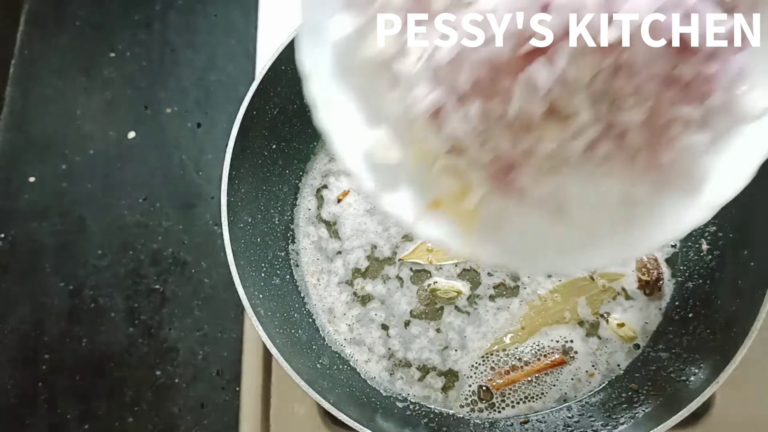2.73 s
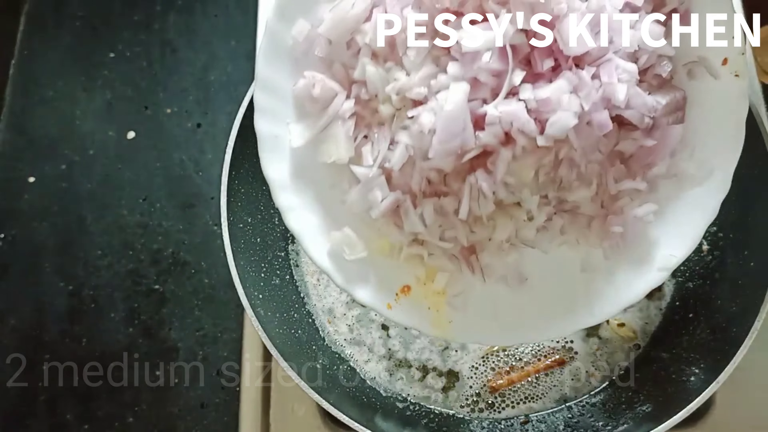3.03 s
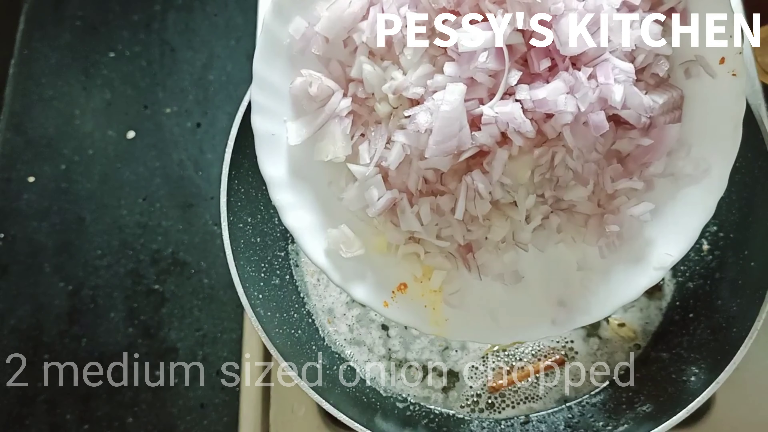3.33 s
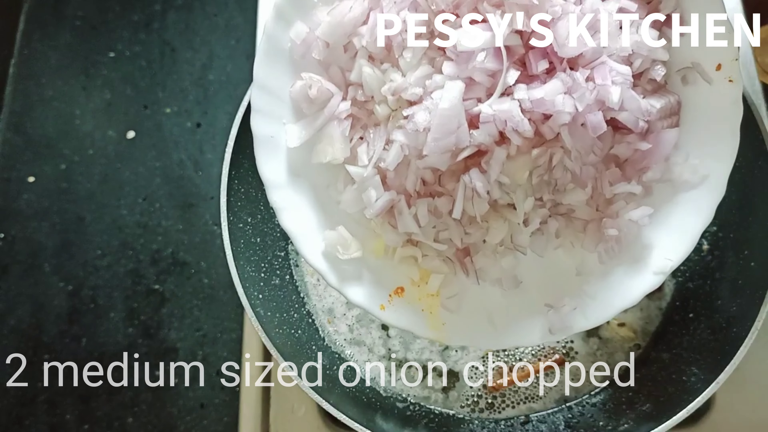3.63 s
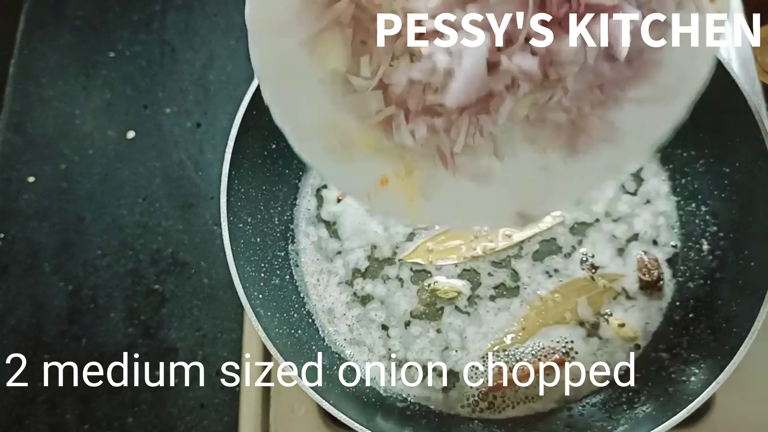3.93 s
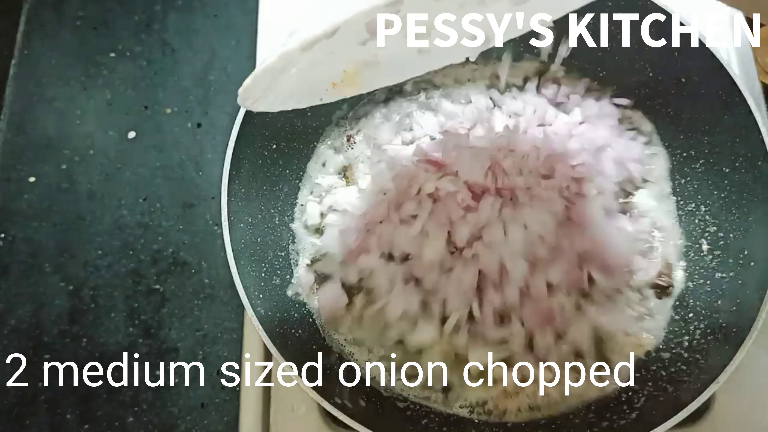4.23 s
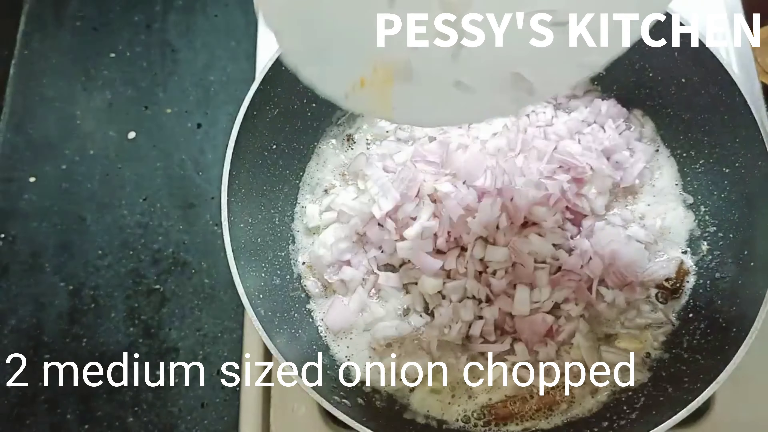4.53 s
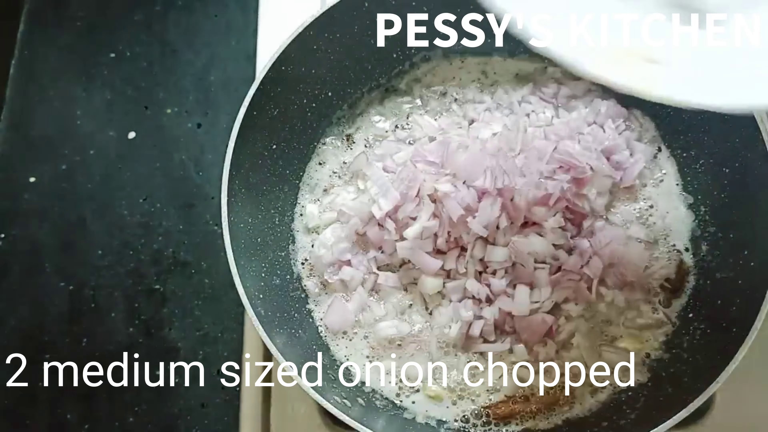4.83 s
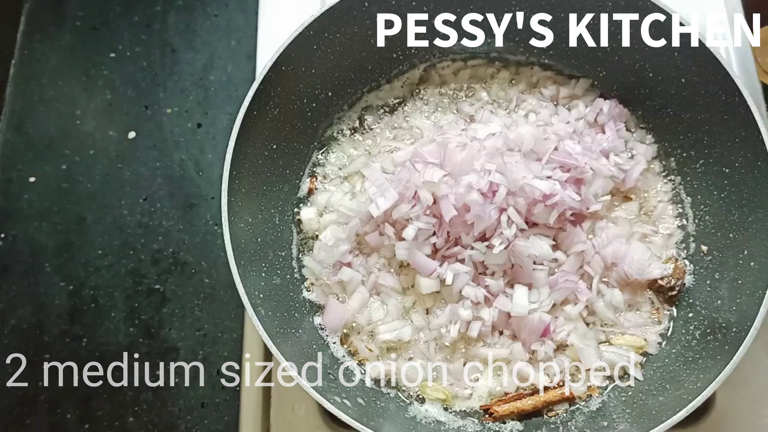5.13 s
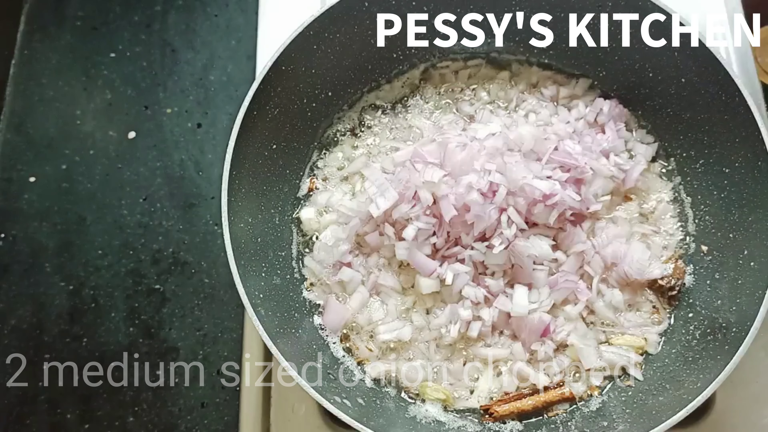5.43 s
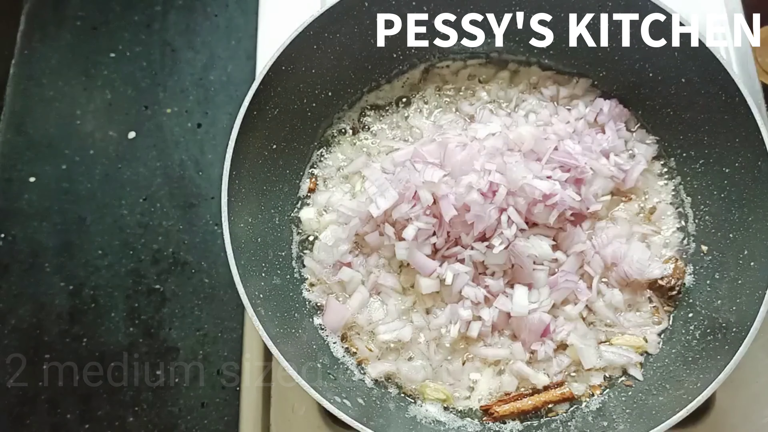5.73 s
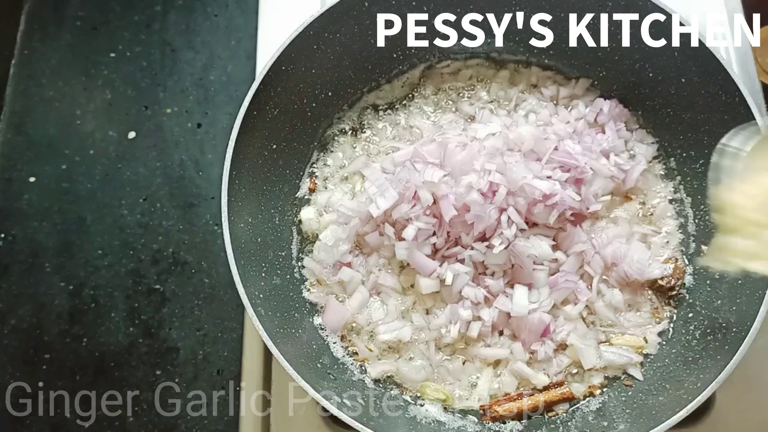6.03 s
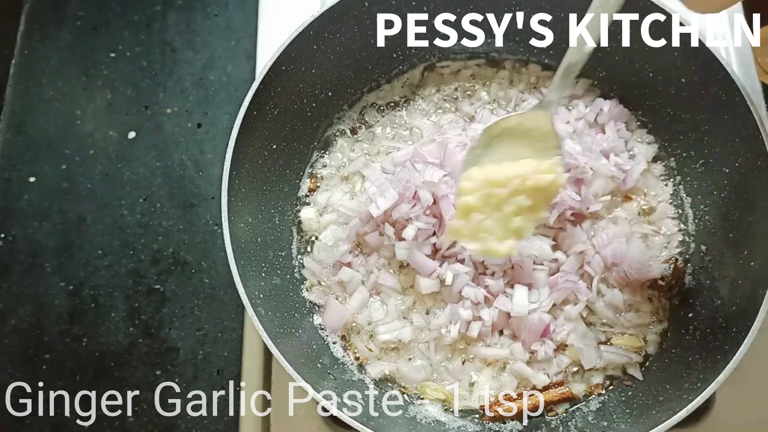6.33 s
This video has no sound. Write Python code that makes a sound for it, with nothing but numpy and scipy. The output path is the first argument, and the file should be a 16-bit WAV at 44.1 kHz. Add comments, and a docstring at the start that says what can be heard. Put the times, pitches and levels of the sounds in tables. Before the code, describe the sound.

A metal spoon knocks and briefly scrapes a frying pan, which rings a little. Butter foams softly while a ceiling fan throbs over a low house rumble, and a horn toots out in the street. Chopped onions drop in with a loud, spitting sizzle that cuts after a second to gentle frying, with two fainter toots. The pan is close to the microphone in a home kitchen.

```python
"""Onions drop into a pan of quietly foaming butter with a loud, spitting sizzle, then fry gently.
The sizzle is water bursting into steam: swarms of clicks over hiss, with pitched pops and sharp spits.
A spoon knocks and scrapes the pan early on, ringing its modes; one more knock comes with the onions.
Behind it a ceiling fan throbs once a turn, the house rumbles, something squeaks faintly and a two-tone
horn sounds in the street. The cooking runs in three stages, joined by hard cuts."""
import sys
import numpy as np
from scipy import signal
from scipy.fft import rfft, irfft
from scipy.io import wavfile

SR = 44100
rng = np.random.default_rng(int(sys.argv[2]) if len(sys.argv) > 2 else 0)


def transcribe(u):
    """Save the signal u as a 16-bit wav file named by the first command-line argument.

    u: samples, shape (n,) or (channels, n), limited to [-1, 1]; the rate is SR.
    q: integer samples, one column per channel.
    """
    v = np.clip(np.atleast_2d(u).T, -1, 1)
    q = np.round(v * 32767).astype(np.int16)
    wavfile.write(sys.argv[1], SR, q)


N = 285327
T = np.arange(N) / SR
LOW_FOAM_S, ONIONS_S, SIMMER_S = 2.115, 4.112, 5.118  # second stage, onions land, third stage

# Tone of foaming butter, then of the duller foam: freq_hz, level_db
FOAM_COLOUR = [(410, -33), (700, -5), (747, -13), (819, -6.5), (921, -15), (995, -8), (1360, -8.5),
               (1530, -8.5), (5570, -4.5), (9380, -15), (14800, -10), (15800, -15.5)]
LOW_FOAM_COLOUR = [(410, -35), (700, -10), (819, -8.5), (909, -12.5), (1470, -14), (2420, -16.5),
                   (2650, -14), (4120, -18.5), (5570, -21), (7810, -28), (13300, -30), (15800, -26)]
# Ringing modes of the pan, struck on its floor or rim: pitch_hz, t60_s, floor_db, rim_db
PAN_MODES = [(394.6, 0.49, -14.5, -35), (549, 0.16, 7.5, -38), (597.3, 0.6, -17, -24.5),
             (623, 0.17, -4, -1), (688, 0.13, -13, -7), (787, 0.28, -17, -32), (884, 0.41, -10.5, -23),
             (970, 0.48, -21, -59), (1160, 0.27, -12, -24), (1183, 0.1, -8.5, -13.5),
             (1282, 0.29, -14, -33), (1814, 0.33, -12.5, -31), (1846, 0.15, 2, -39), (2020, .18, -28, -57),
             (2540, 0.22, -11.5, -24), (2830, 0.062, -56, -33.5), (3640, .16, -15, -34),
             (5360, 0.13, -18, -53)]
# Ringing modes of the spoon: pitch_hz, t60_s, level_db
SPOON_MODES = [(4902, 0.068, 2), (4670, 0.06, -10), (6300, 0.13, -24), (6900, 0.091, -14)]
# Hits on the pan: start_s, ring_db, rim_share (0 floor, 1 rim), click_db, click_hz, contact_s
KNOCKS = [(0.0, -32, 0.64, -27.5, 1130, 0.0069), (0.043, -29.5, 0.59, -26.5, 1170, 0.0037),
          (0.2492, -67, .46, -36.5, 1900, 0.0066), (0.373, -31, 1, -27, 2960, 0.0018),
          (0.4907, -53.5, 0.86, -35, 5670, 0.0013), (0.683, -27.5, 0.13, -14.5, 1250, 0.0033),
          (0.7195, -46, 0.48, -31, 5800, .0015), (0.735, -57, .17, -33.5, 3680, 0.024),
          (4.117, -37, 1, -38, 665, 0.045)]
# Tone of the contact click, the sliding spoon and the grit under it: freq_hz, level_db
CLICK_COLOUR = [(100, -32), (300, -13), (600, 11), (1300, 3.5), (2000, 2), (3200, -2), (4000, -1.5),
                (4900, -7.5), (5800, 2.5), (7000, -12), (11000, -21), (15000, -16)]
SCRAPE_COLOUR = [(260, -20), (450, -1), (597, 1), (1050, -6), (1170, 7), (1550, -32), (1690, -3),
                 (3840, -2.5), (8970, -21.5), (14000, -27), (15800, -12)]
GRIT_COLOUR = [(500, -20), (2600, -10), (5800, 2), (9000, -5), (14000, 0), (15800, -4)]
# Tone of the house rumble and the fan's swish: freq_hz, level_db
RUMBLE_COLOUR = [(12, -45), (20, -7), (44, 3.5), (59, -2.5), (70, -3.5), (105, 2.5), (156, 0.5), (248, -19),
                 (290, -10), (352, -20), (426, -11.5), (549, -14.5), (654, -15), (709, -25), (900, -21.5),
                 (1170, -46.5), (1980, -120)]
SWISH_COLOUR = [(88, -28), (150, -18), (253, -5.5), (281, -9), (348, -0.5), (389, -7.5), (515, -16.5),
                (669, -12.5), (911, -24.5), (1400, -34.5), (1820, -68), (3080, -120)]
# The fan in the first two stages: first_throb_s, turn_s, hum_db, third_harmonic_db, swish_db
FAN_RUNS = [(0.215, .493, -39.5, -63, -52), (2.167, .4288, -41, -49.5, -50.5)]
# Horn blasts: start_s, end_s, relative_db, low_tone_hz, high_tone_hz, low_cut_hz
HONKS = [(3.199, 3.431, -40.5, 339.4, 396.6, 910), (5.17, 5.474, -49.5, 341.3, 404.3, 2670),
         (5.528, 5.8, -54.5, 325.4, 401, 2750)]
# Partials of the horn: tone (0 low, 1 high), harmonic_number, level_db
HORN_PARTIALS = [(0, 4, -21), (0, 5, -19.5), (0, 6, -15), (0, 7, -8), (0, 8, -14.5), (0, 9, -11.5),
                 (0, 10, -0.5), (0, 11, -20.5), (0, 15, -27), (0, 17, -27), (1, 4, -26), (1, 6, -9),
                 (1, 7, -3.5), (1, 8, -10), (1, 13, -33), (1, 14, -23.5)]
# Tone of the horn's breathy rasp: freq_hz, level_db
HORN_RASP_COLOUR = [(900, -33), (1500, -4), (2000, -8), (3200, -5), (3900, 8), (4600, -14), (5600, 2),
                    (7500, -25)]
# Large water drops bursting in the fat: start_s, peak_db
SPITS = [(4.094, -41.5), (4.425, -11.5), (4.465, -8.5), (4.54, -6), (4.567, -11.5), (4.665, -18.5),
         (4.739, -10), (4.747, -13), (4.937, -16)]
# Tone of a spit, the loud sizzle, the gentle frying and the drone under it: freq_hz, level_db
SPIT_COLOUR = [(200, -26), (1000, -14), (1800, -7), (2300, 0.5), (4000, 5), (5800, 3.5), (7000, -1),
               (9000, -7), (11000, -24), (15800, -25)]
SIZZLE_COLOUR = [(200, -30.5), (400, -25), (560, -14.5), (1020, -13.5), (1360, -8.5), (1850, -8.5),
                 (2150, -6), (2600, -3), (3300, 1.5), (4000, 3.5), (4800, -1), (5700, 4), (6400, -2.5),
                 (7300, -8), (11000, -13.5), (14000, -10.5), (15800, -15.5)]
SIMMER_COLOUR = [(180, -28), (300, -12.5), (360, 3), (378, -27), (536, -3.5), (612, -21), (723, 0),
                 (812, -5), (1250, -0.5), (1890, -4), (3490, 2.5), (5560, -1), (8140, -11.5),
                 (13600, -14.5), (15800, -12)]
DRONE_COLOUR = [(20, -55), (120, -33), (149, 8), (165, -9), (200, -27), (500, -63), (2000, -100)]
# Reverb times of kitchen and street: freq_hz, t60_s
KITCHEN_DECAY = [(100, 0.72), (500, 0.55), (2000, 0.55), (6000, 0.42), (15000, 0.7)]
STREET_DECAY = [(1000, 0.72), (3000, 1.28), (6000, 0.49)]


def gain_of(db):
    """Decibels to amplitude."""
    return 10 ** (np.asarray(db) / 20)


def unit_rms(x):
    """Normalise to rms 1."""
    return x / np.sqrt(np.mean(x ** 2) + 1e-20)


def curve_at(points, hz):
    """Read a curve on a log-frequency axis."""
    freq_hz, value = np.transpose(points)
    return np.interp(np.log(hz + 1), np.log(freq_hz + 1), value)


def add(mix, start_s, sound):
    """Lay a sound into the mix."""
    part = mix[..., max(round(start_s * SR), 0):][..., :sound.shape[-1]]
    part += sound[..., :part.shape[-1]]


def gate(start_s, end_s=np.inf):
    """A gate with 4 ms fades."""
    return np.clip((T - start_s) / .004, 0, 1) * np.clip((end_s - T) / .004, 0, 1)


def drift(top_hz, size=N):
    """Smooth random modulation of rms 1."""
    slow = np.fft.rfftfreq(size, 1 / SR) < top_hz
    return unit_rms(irfft(rfft(rng.standard_normal(size)) * slow, size))


def eq(x, colour, size=8192):
    """Minimum-phase EQ, so attacks stay crisp."""
    curve_db = np.maximum(curve_at(colour, abs(np.fft.fftfreq(size, 1 / SR))), -100)
    response = np.exp(np.conj(signal.hilbert(np.log(gain_of(curve_db)))))
    taps = np.fft.ifft(response).real[:size // 2]
    return signal.oaconvolve(x, taps[None], axes=1)[:, :x.shape[1]]


def noise(colour, width):
    """Coloured stereo noise of rms 1; width is the side-to-mid ratio."""
    mid, side = rng.standard_normal((2, N))
    return unit_rms(eq(np.array([mid + width * side, mid - width * side]), colour))


def reverb(x, decay, size=SR):
    """Diffuse tail: sparse reflections, each band dying at its own speed."""
    taps = rng.choice([-1., 1.], (2, size)) * (rng.random((2, size)) < .08) * (T[:size] > .003)
    hz, t, bands = signal.stft(taps, SR, nperseg=256)
    fade = gain_of(-60 * t / curve_at(decay, hz)[:, None])
    tail = signal.istft(bands * fade, SR, nperseg=256)[1]
    return signal.fftconvolve(x, tail / np.linalg.norm(tail[0]), axes=1)[:, :N]


def frying(colour, per_s, spread_db, hiss_db, flutter_db, spots=12):
    """Steam bubbles burst over a fine hiss; each spot in the pan has its own left-right delay."""
    bursts = np.zeros((2, N))
    for spot in range(spots):
        size_db = spread_db * np.minimum(rng.exponential(1, N), 4)
        clicks = -gain_of(size_db) * (rng.random(N) < per_s / spots / SR)
        bursts += [clicks, np.roll(clicks, 3 * (spot - spots // 2))]
        for ear in bursts:  # the pan wall throws each burst back
            ear += .45 * np.roll(clicks, rng.integers(15, 90))
    crackle = unit_rms(bursts - bursts.mean())
    hiss = gain_of(hiss_db) * rng.standard_normal((2, N))
    return unit_rms(eq(crackle + hiss, colour)) * gain_of(flutter_db * drift(14))


def butter():
    """Hot butter foams softly, bright at first, then duller."""
    bright = frying(FOAM_COLOUR, per_s=1500, spread_db=3.3, hiss_db=5.3, flutter_db=.6)
    dull = frying(LOW_FOAM_COLOUR, per_s=1000, spread_db=1.6, hiss_db=5.9, flutter_db=.4)
    first_stage = gain_of(-61) * bright * gate(0, LOW_FOAM_S)
    return first_stage + gain_of(-62.5) * dull * gate(LOW_FOAM_S, SIMMER_S)


def ring(hz, t60_s, db):
    """Struck metal: a sum of decaying sine modes."""
    t = T[:SR // 2, None]
    return (gain_of(db - 60 * t / t60_s) * np.sin(2 * np.pi * hz * t)).sum(1)


def knocks(size=4096):
    """A push and a gritty contact set pan and spoon ringing; a long, soft contact loses the snap."""
    rings, clicks = np.zeros((2, 2, N))
    hz, t60_s, floor_db, rim_db = np.transpose(PAN_MODES)
    for start_s, ring_db, rim, click_db, click_hz, contact_s in KNOCKS:
        pan = ring(hz, t60_s, ring_db + floor_db + rim * (rim_db - floor_db))
        # the spoon rings most after a hard hit on the rim
        spoon_gain = gain_of(click_db - 55 + 51 * rim) / (1 + contact_s / .00099)
        spoon = spoon_gain * ring(*np.transpose(SPOON_MODES))
        attack = 1 - np.exp(-T[:len(pan)] / (.11 * contact_s))
        add(rings, start_s, attack * (pan + spoon))
        grit = rng.standard_normal(size) + .5 * rng.standard_normal((2, size))
        push = gain_of(24) * np.exp(-contact_s / .0053) * signal.unit_impulse(size)
        force = eq(grit * np.exp(-T[:size] / contact_s) - push, CLICK_COLOUR)
        resonance = signal.lfilter(*signal.iirpeak(click_hz, Q=1.9, fs=SR), force)
        click = .32 * force + gain_of(2) * resonance
        add(clicks, start_s, gain_of(click_db) * click / abs(click).max())
    room = reverb(gain_of(-3) * rings + clicks, KITCHEN_DECAY)
    return (rings + clicks + room) * gain_of([[-.7], [.7]])  # a touch to the right


def scrape(hold_s=.12, fade_db_per_s=48, grit_per_s=69):
    """The spoon slides over the greasy pan in uneven slips, catches on grit and lifts away."""
    pressure = gain_of(-48 - fade_db_per_s * np.maximum(T - hold_s, 0))
    slips = noise(SCRAPE_COLOUR, width=.94) * gain_of(2 * drift(70))
    catches = rng.random(N) < grit_per_s / SR
    ticks = signal.lfilter([1], [1, -np.exp(-1 / (.002 * SR))], catches)  # 2 ms decay each
    grit = gain_of(-16) * unit_rms(ticks * noise(GRIT_COLOUR, width=.79))
    return pressure * (slips + grit) * gate(0, .89)


def rumble():
    """The house as a low, nearly mono noise bed."""
    return gain_of(np.where(T < LOW_FOAM_S, -57.5, -56.5)) * noise(RUMBLE_COLOUR, width=.1)


def swell(t, rise_s, fall_s, tail_db, tail_s):
    """Rounded rise to a peak at t = 0, then a quick fall and a lingering room tail."""
    after, tail = np.maximum(t, 0), gain_of(tail_db)
    rise = np.exp(-(np.minimum(t, 0) / rise_s) ** 2)
    return rise * ((1 - tail) * np.exp(-(after / fall_s) ** 2) + tail * np.exp(-after / tail_s))


def fan(hum_hz=118.3, size=SR * 3 // 5):
    """Once a turn the fan gives a swish of air, then a swelling hum whose pitch sags."""
    out = np.zeros((2, N))
    t = T[:size] - .15  # zero at the peak of the throb
    phase = 2 * np.pi * hum_hz * (t - .1296 * t ** 2)
    hum_env = swell(t, rise_s=.035, fall_s=.025, tail_db=-9, tail_s=.21)
    third_env = swell(t, rise_s=.068, fall_s=.069, tail_db=-7, tail_s=.16)
    swish_env = swell(t + .048, rise_s=.03, fall_s=.13, tail_db=-3, tail_s=.18)
    stages = (0, LOW_FOAM_S), (LOW_FOAM_S, SIMMER_S)
    for (first_s, turn_s, hum_db, third_db, swish_db), (start_s, end_s) in zip(FAN_RUNS, stages):
        hum, swish = np.zeros((2, N))
        for peak_s in np.arange(first_s, end_s, turn_s):
            root = gain_of(hum_db) * hum_env * np.cos(phase + .74 * drift(15, size))
            third_gain = gain_of(third_db + 2 * drift(40, size)) * third_env
            third = third_gain * np.cos(3 * phase + .59 * drift(35, size))
            add(hum, peak_s + t[0], root + third)
            add(swish, peak_s + t[0], gain_of(swish_db) * swish_env)
        out += (hum + swish * noise(SWISH_COLOUR, width=.63)) * gate(start_s, end_s)
    return out


def squeak(start_s=2.8, end_s=3.3, pitch_hz=3920):
    """A faint, thin squeak: one wavering sine that fades in and out."""
    arch = np.sin(np.pi * np.clip((T - start_s) / (end_s - start_s), 0, 1))
    level = gain_of(-72 + 3.5 * drift(20)) * arch
    hz = pitch_hz * (1 + .0088 * drift(130))
    return level * np.sin(2 * np.pi * np.cumsum(hz) / SR)


def horn(attack_s=.08, release_s=.1, size=SR):
    """Two buzzing diaphragms about a minor third apart; the street draws each blast out."""
    direct, t = np.zeros((2, N)), T[:size]
    for start_s, end_s, db, low_hz, high_hz, low_cut_hz in HONKS:
        tones = low_hz, high_hz
        cycles = [np.cumsum(hz * (1 + .003 * drift(40, size))) / SR for hz in tones]
        buzz = np.zeros(size)
        for tone, harmonic, partial_db in HORN_PARTIALS:
            low_cut = 1 / (1 + (low_cut_hz / (harmonic * tones[tone])) ** 12)
            level = low_cut * gain_of(partial_db + 2.5 * drift(25, size))
            buzz += level * np.sin(2 * np.pi * harmonic * cycles[tone])
        roughness = 1 + .27 * drift(220, size)
        blast = np.clip(t / attack_s, 0, 1) * np.clip((end_s - start_s - t) / release_s, 0, 1)
        rasp = gain_of(-20.5) * noise(HORN_RASP_COLOUR, width=.38)[:, :size]
        add(direct, start_s, gain_of(db) * (unit_rms(buzz * roughness) + rasp) * blast)
    return gain_of(-5.5) * direct + reverb(direct, STREET_DECAY)


def spits(splash_s=.0013, size=600):
    """Drops of water explode around the pan, each a sharp snap with a tiny splash."""
    out = np.zeros((2, N))
    for start_s, peak_db in SPITS:
        splash = .2 * rng.standard_normal(size) + .1 * rng.standard_normal((2, size))
        burst = splash * np.exp(-T[:size] / splash_s) - signal.unit_impulse(size)
        for ear, pop, lag_s in zip(out, eq(burst, SPIT_COLOUR), (0, rng.normal(0, .00004))):
            add(ear, start_s + lag_s, gain_of(peak_db) * pop / abs(pop).max())
    return out + gain_of(-7) * reverb(out, KITCHEN_DECAY)


def steam(boil_db=-31, boil_rise_s=.066, surge_rise_s=.015, surge_fall_s=.25):
    """Envelope of the boil: a quick rise to a steady level, plus a dying surge for each clump."""
    power = (gain_of(boil_db) * np.clip((T - ONIONS_S) / boil_rise_s, 0, 1)) ** 2
    for start_s, level_db in (4.16, -33.5), (4.265, -28), (4.4, -27):  # three clumps fall in
        age = np.maximum(T - start_s, 0)
        surge = np.minimum(age / surge_rise_s, 1) * np.exp(-age / surge_fall_s)
        power += (gain_of(level_db) * surge) ** 2
    return np.sqrt(power)


def onions():
    """Wet onion flashes into steam, its fine spray thinning as it dries; then it simmers and eases."""
    sizzle = frying(SIZZLE_COLOUR, per_s=4000, spread_db=3.8, hiss_db=-.73, flutter_db=.95)
    body = signal.sosfiltfilt(signal.butter(4, 8000, fs=SR, output="sos"), sizzle)
    spray = gain_of(-5.5 - 3 * (T - ONIONS_S)) * unit_rms(sizzle - body)
    flare = steam() * (unit_rms(body) + spray) * gate(ONIONS_S, SIMMER_S)
    simmer = frying(SIMMER_COLOUR, per_s=2500, spread_db=1.6, hiss_db=3, flutter_db=.62)
    simmer *= gain_of(-48 - .8 * (T - SIMMER_S)) * gate(SIMMER_S - .004)
    return (flare + simmer) * gain_of([[-.5], [.5]])  # a touch to the right


def sputter(per_s=260, low_hz=2096, high_hz=4440, pitches=24, decay_cycles=10):
    """Larger steam bubbles collapse among the onions, each a short pitched pop."""
    out, t = np.zeros((2, N)), T[:900]
    for hz in np.geomspace(low_hz, high_hz, pitches):
        size_db = 3.1 * np.minimum(rng.exponential(1, N), 3)
        triggers = gain_of(size_db) * (rng.random(N) < per_s / pitches / SR)
        pop = np.exp(-hz * t / decay_cycles) * np.sin(2 * np.pi * (hz * t + rng.random((2, 1))))
        out += signal.oaconvolve(triggers[None], pop, axes=1)[:, :N]
    return gain_of(-13) * steam() * unit_rms(out) * gate(ONIONS_S, SIMMER_S)


def drone():
    """A faint, narrow band of noise near 150 Hz under the simmer."""
    return gain_of(-63) * noise(DRONE_COLOUR, width=.078) * gate(SIMMER_S)


def scene():
    """The pan up front; fan, horn and squeak behind it, over the low bed of the house."""
    bed = rumble() + drone()
    pan = butter() + onions() + sputter() + spits() + knocks() + scrape()
    return bed + pan + fan() + horn() + squeak()


def record(dry):
    """A steep low-pass on the master takes off the very top."""
    low_pass = signal.firwin(511, cutoff=15780, window=("kaiser", 9), fs=SR)
    return signal.oaconvolve(dry, low_pass[None], "same")


dry = scene()
out = record(dry)
transcribe(out)
```